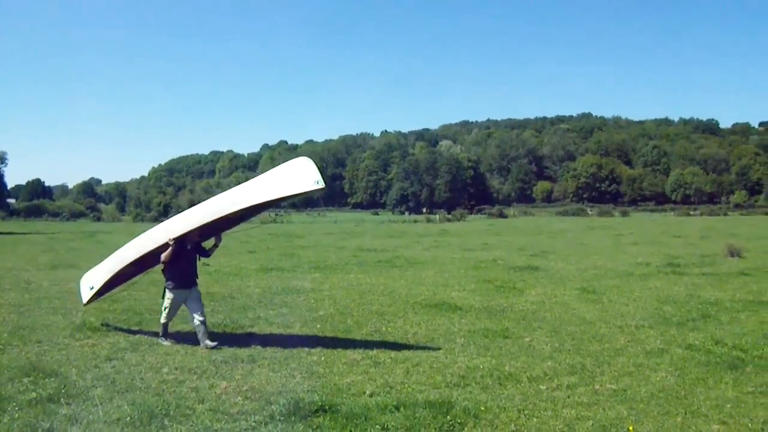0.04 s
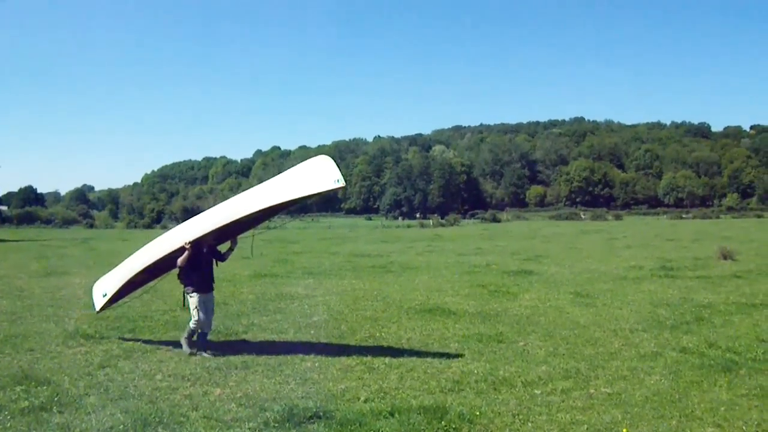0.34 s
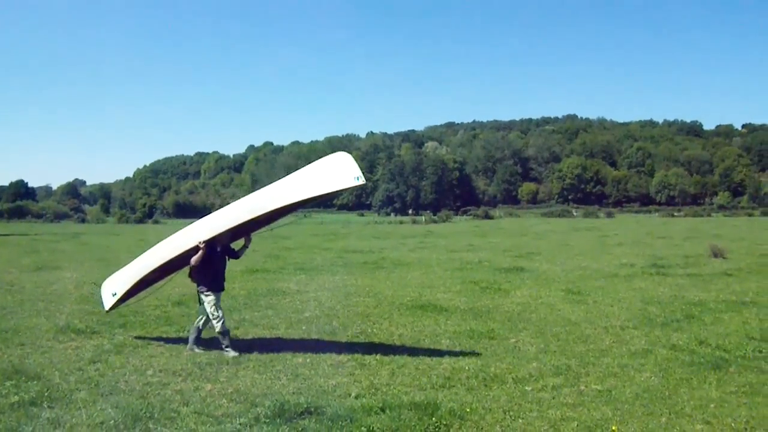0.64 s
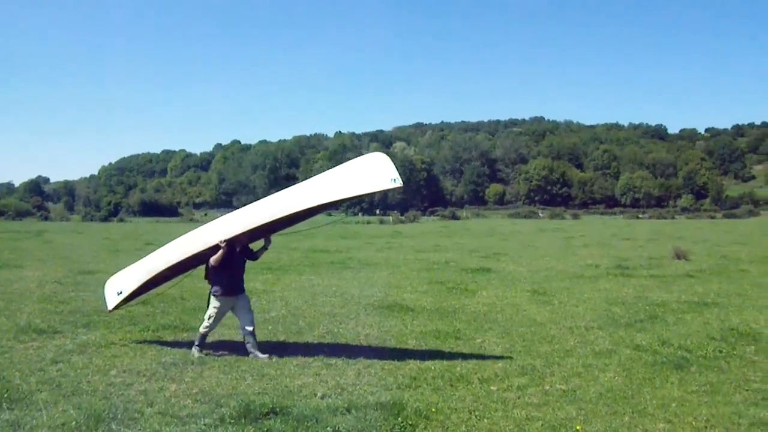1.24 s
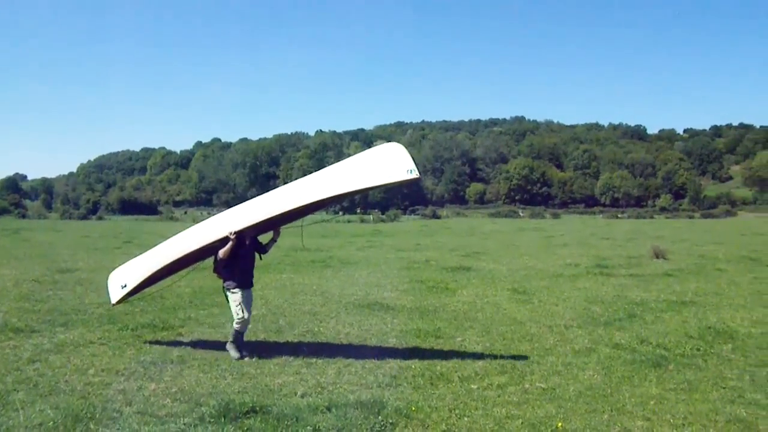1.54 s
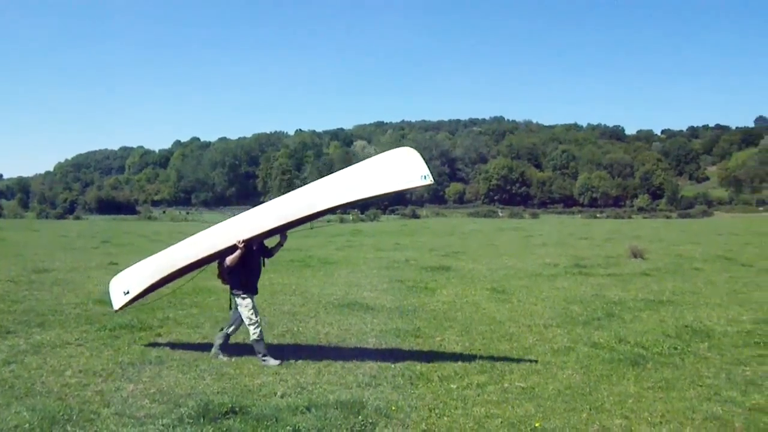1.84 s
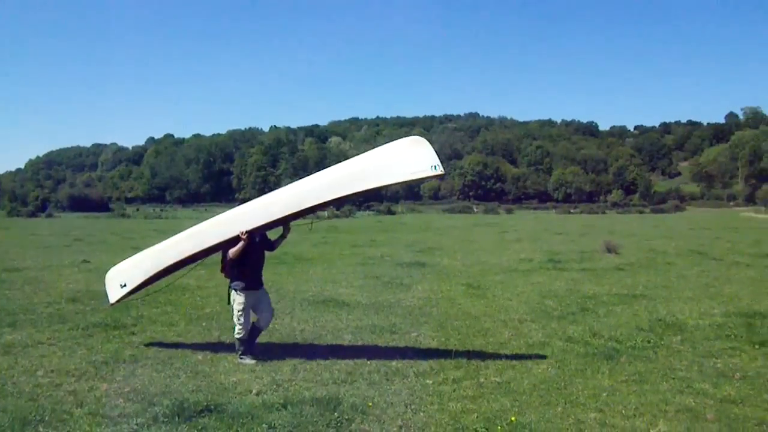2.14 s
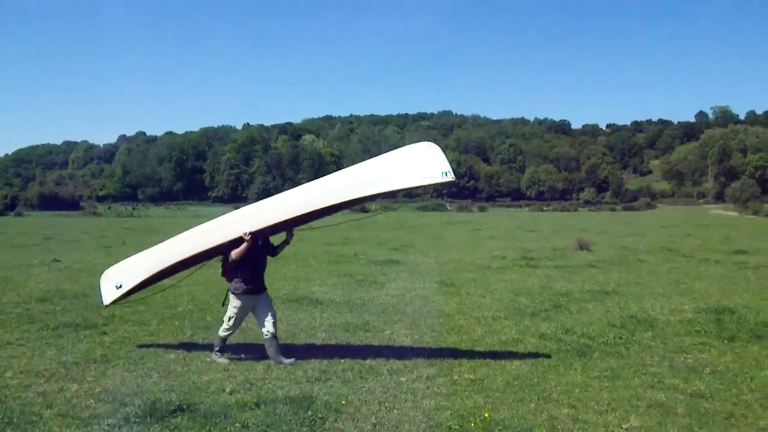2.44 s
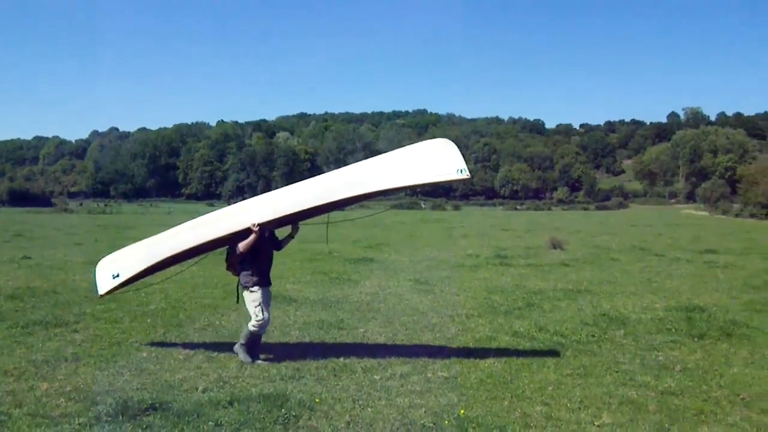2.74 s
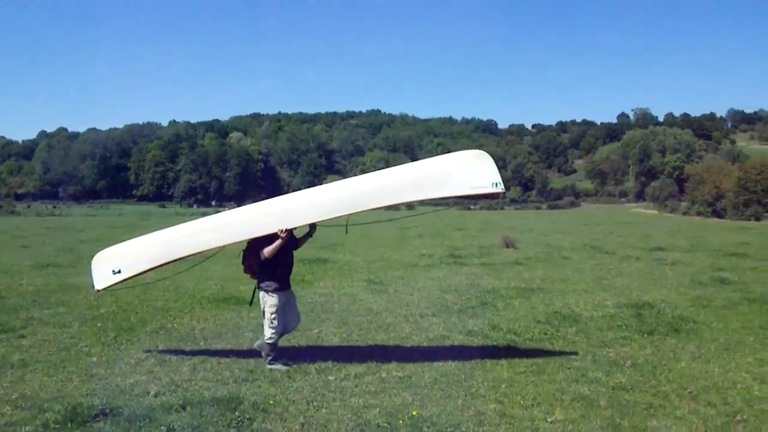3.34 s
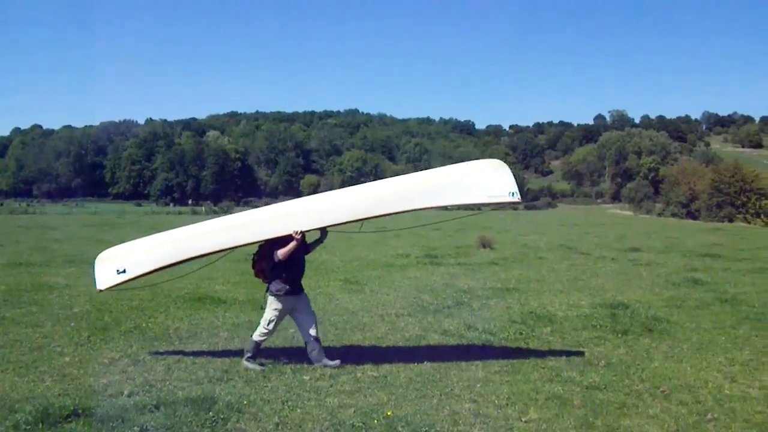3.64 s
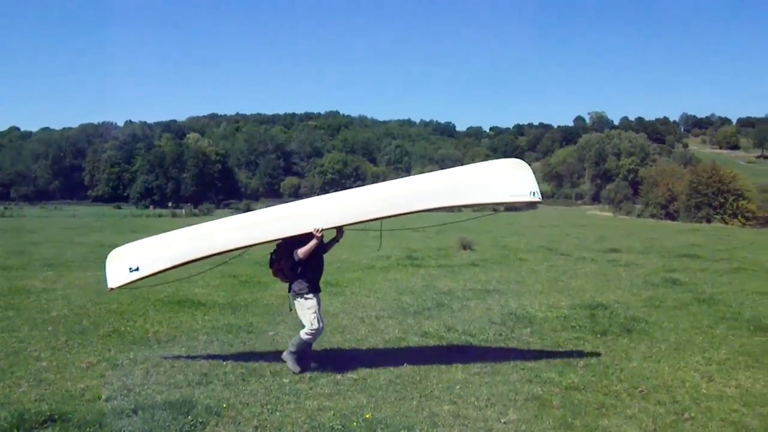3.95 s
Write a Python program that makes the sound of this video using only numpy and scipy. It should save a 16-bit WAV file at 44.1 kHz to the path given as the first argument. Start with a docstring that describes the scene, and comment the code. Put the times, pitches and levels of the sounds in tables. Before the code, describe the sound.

Gusty wind rumbles on the microphone over a soft hiss and faint steps in grass.

```python
"""An open meadow, where gusts buffet a small microphone.
Turbulent eddies thump on its port, quicker and brighter as the wind rises.
Behind them lies a far wash of trees and distant traffic or aircraft, with faint humming peaks,
and something far off whines faintly, perhaps traffic.
Someone walks through the grass with a load: blades rustle, boots swish and the gear ticks."""
import sys
import numpy as np
from scipy import signal
from scipy.fft import rfft, irfft
from scipy.io import wavfile
from scipy.ndimage import map_coordinates

SR = 44100
rng = np.random.default_rng(int(sys.argv[2]) if len(sys.argv) > 2 else 0)


def transcribe(signal):
    """Save signal, clipped to [-1, 1], as a 16-bit WAV file at the path in sys.argv[1]."""
    frames = np.atleast_2d(signal).T
    limited = np.clip(frames, -1, 1)
    pcm = np.round(limited * 32767).astype(np.int16)
    wavfile.write(sys.argv[1], SR, pcm)


N = 176400


def undb(db):
    """Decibels to amplitude ratio."""
    return 10 ** (np.asarray(db) / 20)


def unit(x):
    """Normalisation to a standard deviation of 1."""
    return x / np.std(x)


def curve(rows):
    """Linear interpolation between (time [s], value) rows."""
    return np.interp(np.arange(N) / SR, *np.array(rows).T)


def walk(hz):
    """Random modulation of spread 1, lying mostly below hz."""
    steps = rng.standard_normal(int(2 * hz * N / SR) + 2)
    return unit(np.interp(np.arange(N) / SR * 2 * hz, np.arange(len(steps)), steps))


def colour(x, spectrum):
    """Spectral shaping by (frequency [Hz], gain [dB]) rows, at rms 1."""
    hz, db = np.array(spectrum).T
    bin_hz = np.arange(len(x) // 2 + 1) * SR / len(x)
    gain = undb(np.interp(np.log(bin_hz + 1), np.log(hz), db))
    return unit(irfft(rfft(x) * gain, len(x)))


def resonate(x, hz, width_hz):
    """Response of a second-order resonator, at rms 1."""
    return unit(signal.lfilter(*signal.iirpeak(hz, hz / width_hz, fs=SR), x))


def grains(spread_db):
    """Amplitude-modulated noise, as from many tiny contacts of uneven size."""
    return unit(rng.standard_normal(N) * undb(spread_db * walk(2500)))


def add(out, at, sound):
    """Superposition of a short sound, starting at a time in seconds."""
    start = max(int(at * SR), 0)
    out[start:start + len(sound)] += sound[:max(N - start, 0)]


def wind():
    """Frozen turbulence: faster flow sweeps eddies over the port sooner, raising their frequencies."""
    # wind strength at the microphone (time [s], level [dB])
    gusts = [(0.0, -24), (0.2, -27.5), (0.3, -25.5), (0.48, -26), (0.53, -30.5), (0.58, -25), (0.62, -33.5),
             (0.65, -26), (1.0, -28), (1.11, -33), (1.14, -40.5), (1.24, -33), (1.27, -39.5), (1.44, -34.5),
             (1.52, -31), (1.55, -43), (1.68, -46.5), (1.72, -33), (1.84, -32.5), (1.91, -47.5),
             (1.92, -34), (1.96, -28.5), (2.03, -33.5), (2.06, -28), (2.19, -28.5), (2.25, -25),
             (2.31, -33), (2.33, -55), (2.47, -41.5), (2.51, -48.5), (2.54, -37), (2.59, -50), (2.645, -28),
             (2.675, -29), (2.69, -44), (2.75, -33.5), (2.81, -21.5), (2.885, -24), (2.905, -34),
             (2.94, -24), (2.97, -28), (3.02, -20.5), (3.07, -26.5), (3.19, -24.5), (3.23, -31),
             (3.26, -25), (3.3, -29.5), (3.32, -48), (3.36, -39.5), (3.38, -49.5), (3.45, -38),
             (3.59, -31.5), (3.62, -44.5), (3.7, -60), (3.86, -53), (4.0, -60)]
    # eddy pressure in a moderate gust (frequency [Hz], relative spectral level [dB])
    spectrum = [(30, -12), (60, -10.5), (100, -6.5), (185, 1), (240, -1), (350, -7.5), (480, -15),
                (800, -27.5), (1300, -48), (2500, -55), (6000, -82)]
    moderate_db, speed_up = -26, 0.14  # twice the moderate pressure adds this fraction of speed
    level_db = curve(gusts) + 2.5 * walk(hz=89.72)
    speed = 1 + speed_up * (undb(level_db - moderate_db) - 1)
    pressure_field = colour(rng.standard_normal(2 * N), spectrum)
    at_port = map_coordinates(pressure_field, [np.cumsum(speed)], order=1, mode="mirror")
    return at_port * undb(level_db + 0.86)


def far_wash():
    """Incoherent summation: trees and distant traffic or aircraft merge into one swelling wash."""
    # far wash, with faint humming peaks at 1-1.9 kHz (frequency [Hz], relative spectral level [dB])
    spectrum = [(30, -35), (200, -5.5), (400, -0.5), (800, -1), (1020, 5.5), (1170, -1), (1400, 3),
                (1600, -3.5), (1870, 1.5), (2400, -0.5), (3200, -2), (4100, -2), (4700, -8), (6300, -6),
                (8500, -15), (15500, -33)]
    # slow swell of the wash (time [s], relative level [dB])
    swell = [(0, -49.5), (0.7, -46.5), (0.95, -45), (1.45, -45.5), (1.75, -49), (2.1, -48), (2.45, -44.5),
             (2.65, -46), (2.85, -42), (3.08, -43.5), (3.3, -42), (3.8, -42.5), (4, -44)]
    level_db = curve(swell) + 3 + 0.74 * walk(hz=42)
    return colour(grains(spread_db=2.0), spectrum) * undb(level_db)


def footsteps():
    """Friction noise: grass blades rustle throughout and swish as a boot sweeps through."""
    # grass against boots (frequency [Hz], relative spectral level [dB])
    swish_spectrum = [(1500, -24), (4000, 8), (5000, -12), (6700, 12), (8500, 0.5), (12000, -6.5),
                      (15000, 3.5)]
    # sweeps of a boot (peak time [s], duration [s], level [dB])
    swishes = [(0.103, 0.022, -51.5), (0.666, 0.055, -50), (1.19, 0.032, -50), (1.77, 0.12, -45.5),
               (2.86, 0.074, -47), (2.96, 0.062, -38), (3.528, 0.11, -41), (3.637, 0.046, -34),
               (3.908, 0.029, -37)]
    # softer continuous rustle (frequency [Hz], relative spectral level [dB])
    rustle_spectrum = [(1000, -7), (2500, -30), (3900, 0), (4800, -3.5), (6600, 2), (8500, -10),
                       (15500, -12.5)]
    # envelope of the rustle (time [s], level [dB])
    rustle_level = [(0, -56.5), (1.62, -58), (1.72, -47), (2.1, -50.5), (2.35, -44.5), (2.65, -46.5),
                    (2.88, -40.5), (3.05, -49), (3.6, -44.5), (3.8, -55), (3.9, -40.5), (4, -52)]
    t = np.arange(N) / SR
    sweep = sum(undb(db) * np.exp(-2 * ((t - at) / length) ** 2) for at, length, db in swishes)
    swish = sweep * colour(grains(spread_db=6.5), swish_spectrum)
    rustle_db = curve(rustle_level) + 1.8 * walk(hz=24.1)
    rustle = undb(rustle_db) * colour(grains(spread_db=4.5), rustle_spectrum)
    return swish + rustle


def eddies():
    """Convected pressure pulses: each strong eddy is one swing; small ones slap, large ones thump."""
    # strong single eddies (time [s], relative peak level [dB], centre frequency [Hz])
    pulses = [(.144, -19.5, 690), (0.155, -9, 290), (0.156, -25, 890), (0.249, -11, 252), (.252, -21, 590),
              (.35, -10, 235), (.396, -14, 324), (.431, -17, 740), (.555, -23, 564), (0.575, -12.5, 207),
              (.705, -20, 553), (.714, -17.5, 570), (.731, -25, 716), (.776, -21.5, 646), (0.885, -15, 278),
              (1.013, -18.5, 209), (1.241, -16.5, 239), (1.395, -22.5, 290), (1.458, -18, 590),
              (1.515, -23, 525), (1.528, -18, 268), (1.725, -23.5, 364), (1.955, -17, 244),
              (2.076, -21.5, 470), (2.217, -15, 550), (2.221, -8, 310), (2.786, -13, 244),
              (2.796, -16, 580), (2.871, -19, 656), (2.878, -8, 245), (2.883, -12.5, 680),
              (3.024, -20.5, 820), (3.027, -12, 367), (3.057, -17, 510), (3.106, -10, 244),
              (3.135, -15.5, 485), (3.176, -16.5, 533), (3.195, -15.5, 645), (3.267, -12, 343),
              (3.268, -19, 720), (3.299, -19.5, 260)]
    width_cycles = 0.54
    t, out = np.arange(-SR // 20, SR // 20) / SR, np.zeros(N)
    for at, db, hz in pulses:
        envelope = undb(db + 0.5) * np.exp(-0.5 * (t * hz / width_cycles) ** 2)
        swing = np.cos(2 * np.pi * (t * hz + rng.random()))
        add(out, at + t[0], envelope * swing)
    return out


def whine():
    """Amplitude and frequency modulation: far tones swell, waver, sink slowly in pitch and fade."""
    # far tones (peak time [s], 1/e half-width [s], frequency at the peak [Hz], relative level [dB])
    tones = [(.9, .35, 985, -52), (1.03, .22, 1380, -53.5), (1.2, .25, 1915, -56), (.95, .2, 2345, -56),
             (3.6, .3, 885, -50.5), (3.65, .3, 1066, -56), (3.5, .35, 1243, -53), (3.3, .15, 1480, -54),
             (3.52, .2, 1432, -51), (3.88, .2, 1355, -52), (3.5, .2, 2826, -56)]
    sag_per_s, waver, flicker_db = 0.018, 0.00245, 3
    t, out = np.arange(N) / SR, np.zeros(N)
    for at, half_width, hz, db in tones:
        pitch = hz * (1 - sag_per_s * (t - at) + waver * walk(hz=25))
        swell = np.exp(-((t - at) / half_width) ** 2) * undb(db - 1 + flicker_db * walk(hz=12))
        out += swell * np.sqrt(2) * np.sin(2 * np.pi * np.cumsum(pitch) / SR)
    return out


def gear():
    """Damped resonance: each dry tick of the load is a broadband crack and a quickly dying ring."""
    # ticks of the gear (time [s], relative level [dB], centre frequency [Hz], decay time [s])
    ticks = [(1.462, -26, 3620, 0.0072), (1.471, -29.5, 3850, 0.0087), (1.774, -33, 3460, 0.0023),
             (1.955, -28, 6160, 0.0025), (1.955, -36, 11800, 0.0027), (2.149, -29, 6300, 0.0038),
             (2.557, -31, 3720, 0.0065), (2.64, -22, 3600, 0.0025), (2.781, -27, 4030, 0.0037),
             (2.943, -19.5, 1900, 0.0022), (3.436, -23.5, 3970, 0.0023), (3.591, -21.5, 4800, 0.0017),
             (3.778, -27.5, 3870, 0.0048), (3.875, -28, 2980, .004), (3.873, -17, 3850, 0.0029)]
    width_hz, crack_db, crack_decay_s = 640, -8.5, 0.0018
    t, out = np.arange(SR // 10) / SR, np.zeros(N)
    for at, db, hz, decay in ticks:
        noise = rng.standard_normal(len(t))
        ring = resonate(resonate(noise, hz, width_hz), hz, width_hz) * np.exp(-t / decay)
        crack = undb(crack_db) * noise * np.exp(-t / crack_decay_s)
        add(out, at, undb(db - 5) * (ring + crack))
    return out


def scene():
    """Superposition at one microphone, whose port acts as a high-pass filter on the wind pressure."""
    port_hz, self_noise_db = 106.8, -50.5
    port = signal.butter(3, port_hz, "high", fs=SR, output="sos")
    buffeting = signal.sosfilt(port, wind() + eddies())
    self_noise = undb(self_noise_db) * rng.standard_normal(N)
    return (buffeting + far_wash() + footsteps() + whine() + gear() + self_noise)[None]


def record(dry):
    """Frequency response: the microphone has a narrow treble notch; the recorder limits the bandwidth."""
    notch_hz, notch_width_hz, cutoff_hz = 7850, 700, 15800
    notched = signal.lfilter(*signal.iirnotch(notch_hz, notch_hz / notch_width_hz, fs=SR), dry)
    low_pass = signal.ellip(10, 0.2, 80, cutoff_hz, fs=SR, output="sos")
    return signal.sosfilt(low_pass, notched)


dry = scene()
out = record(dry)
transcribe(out)
```